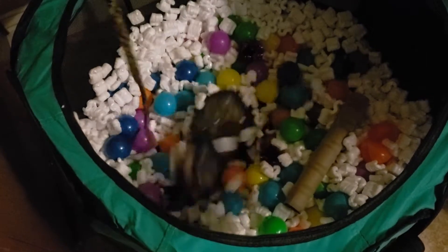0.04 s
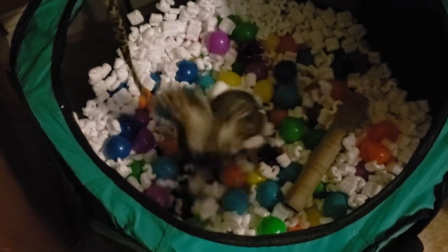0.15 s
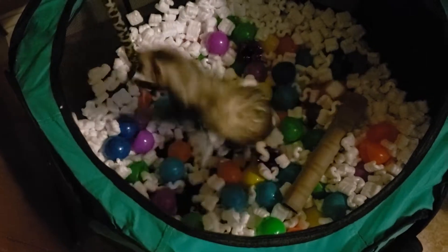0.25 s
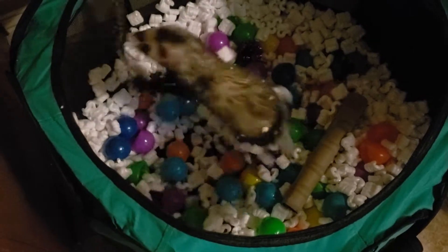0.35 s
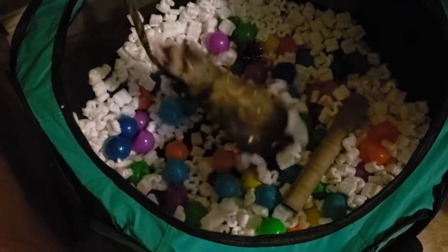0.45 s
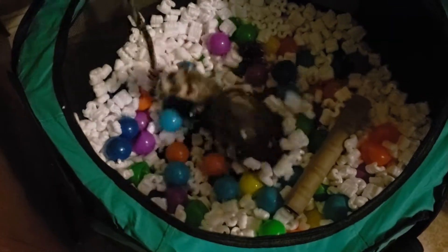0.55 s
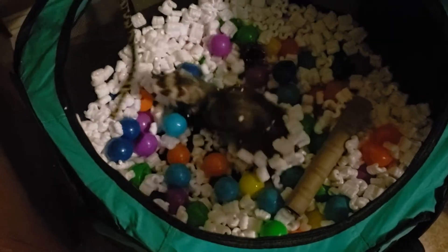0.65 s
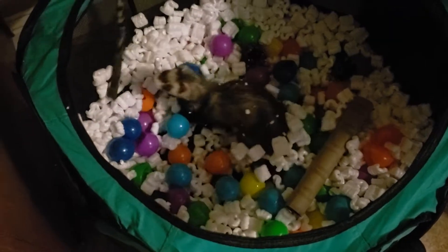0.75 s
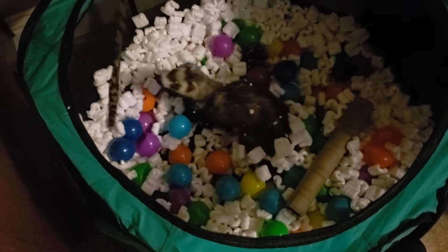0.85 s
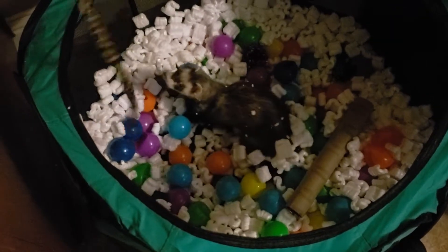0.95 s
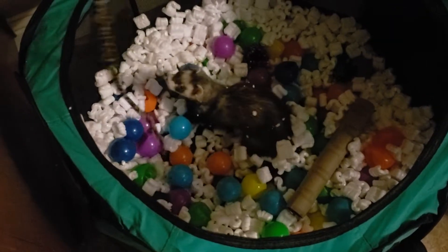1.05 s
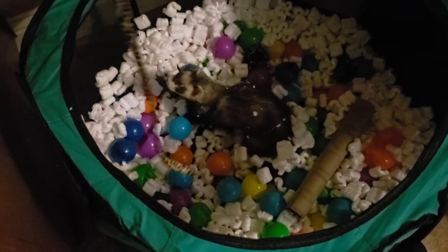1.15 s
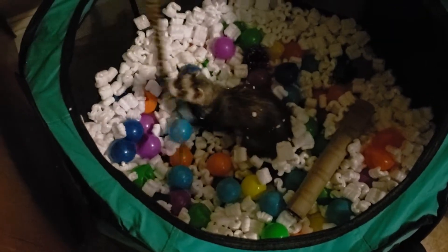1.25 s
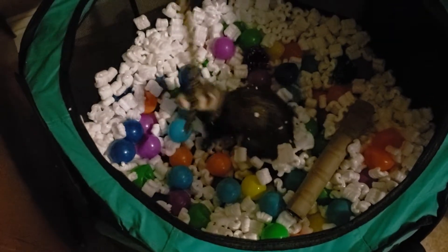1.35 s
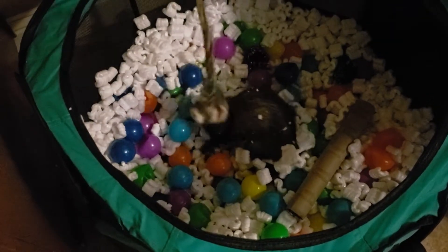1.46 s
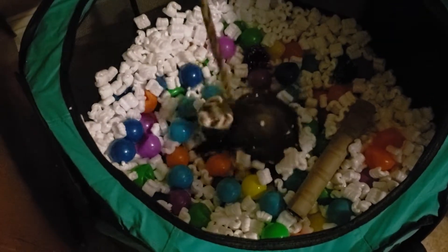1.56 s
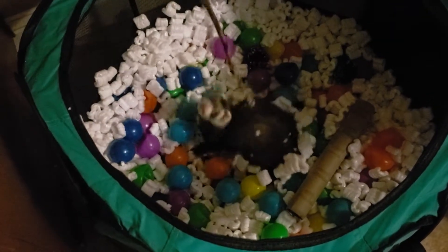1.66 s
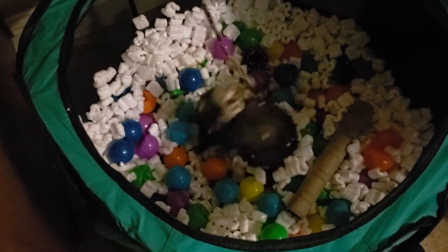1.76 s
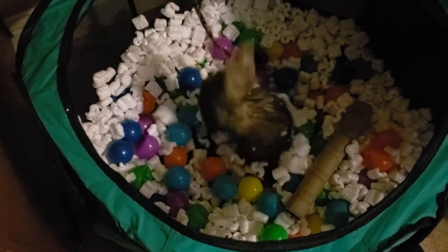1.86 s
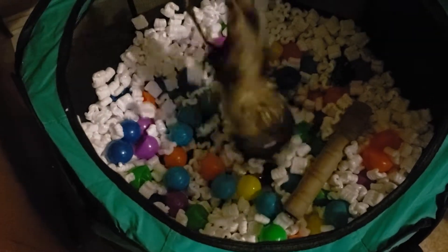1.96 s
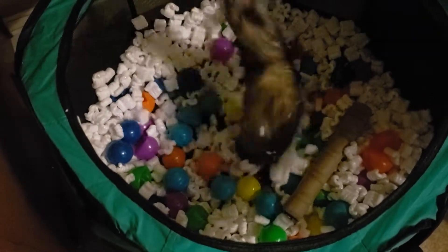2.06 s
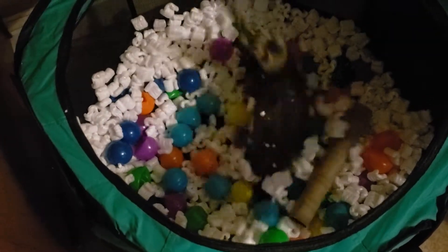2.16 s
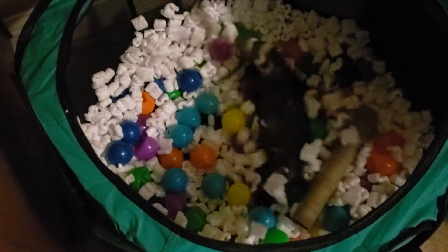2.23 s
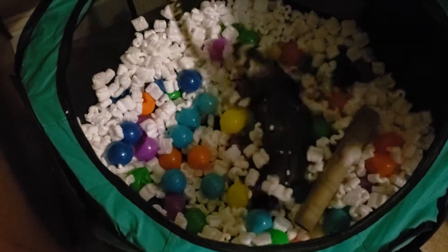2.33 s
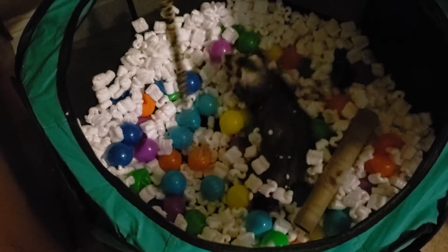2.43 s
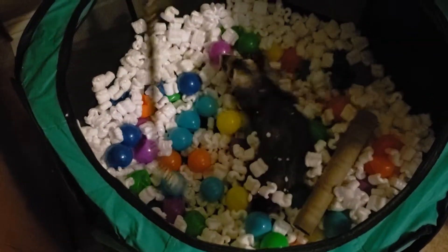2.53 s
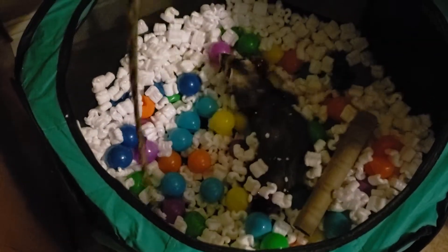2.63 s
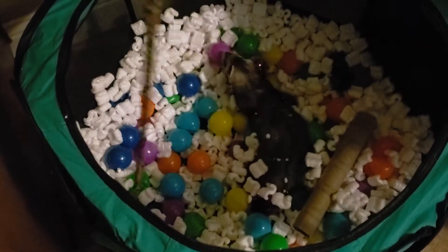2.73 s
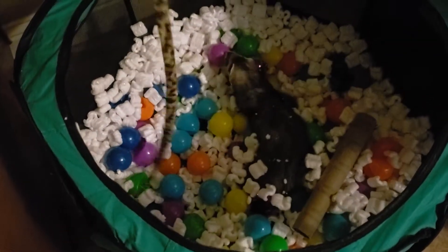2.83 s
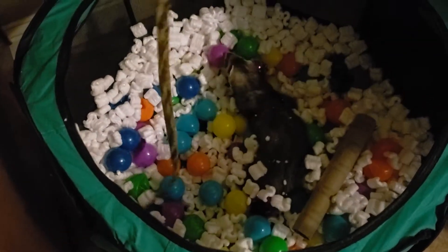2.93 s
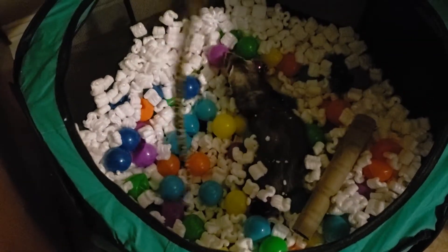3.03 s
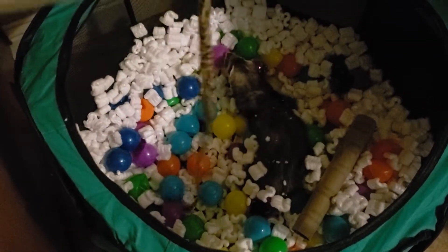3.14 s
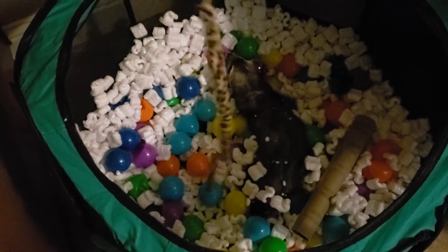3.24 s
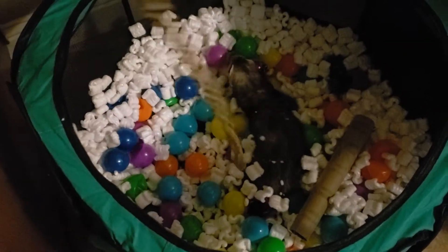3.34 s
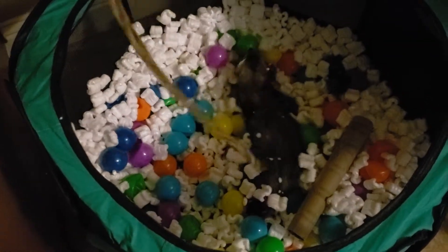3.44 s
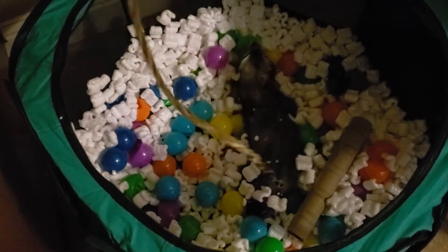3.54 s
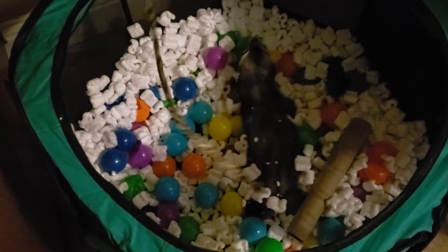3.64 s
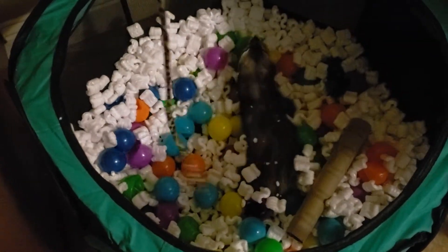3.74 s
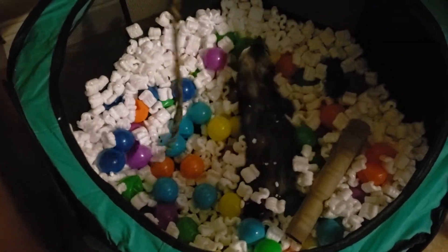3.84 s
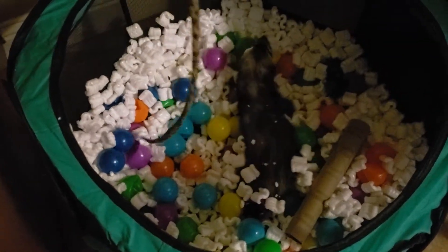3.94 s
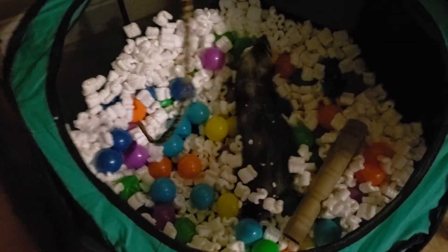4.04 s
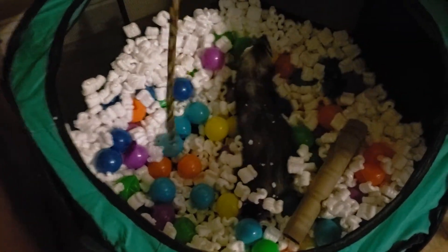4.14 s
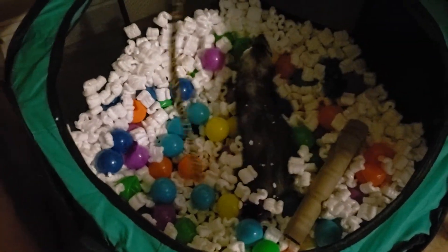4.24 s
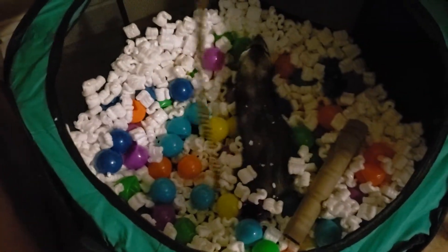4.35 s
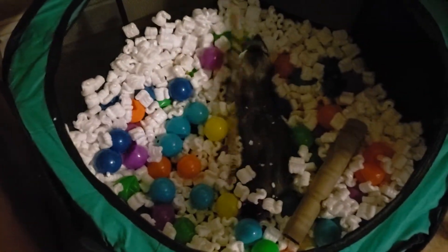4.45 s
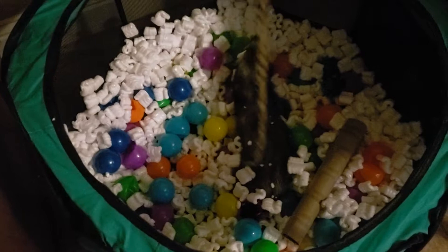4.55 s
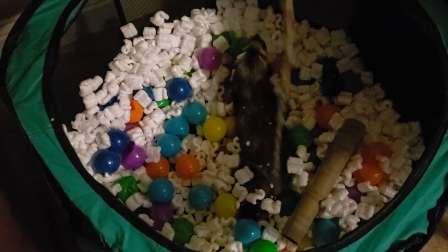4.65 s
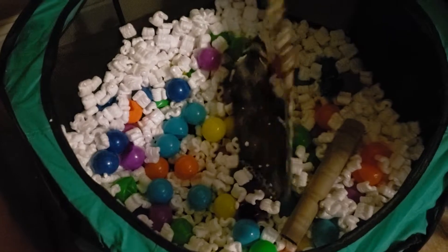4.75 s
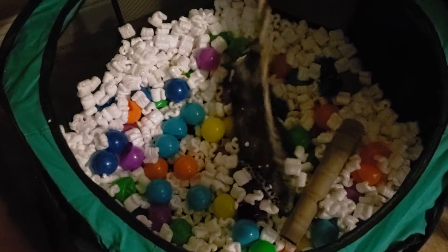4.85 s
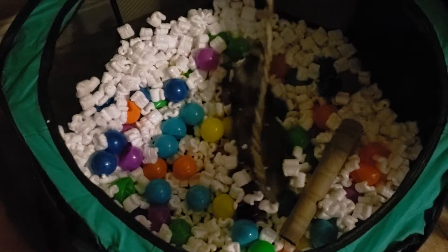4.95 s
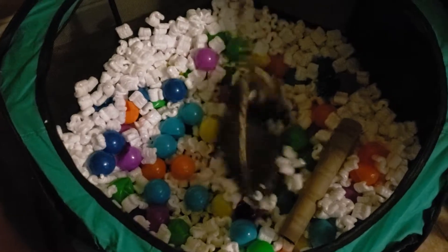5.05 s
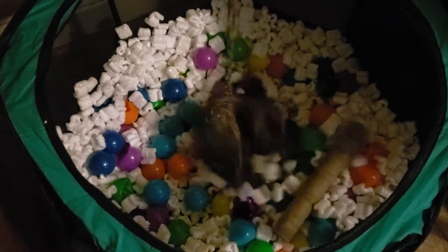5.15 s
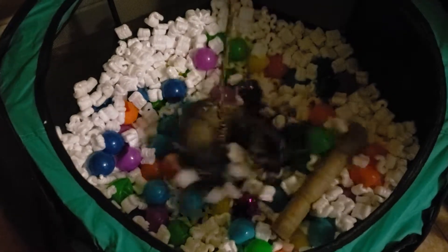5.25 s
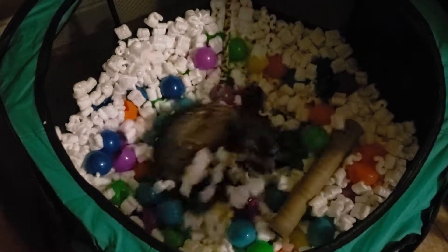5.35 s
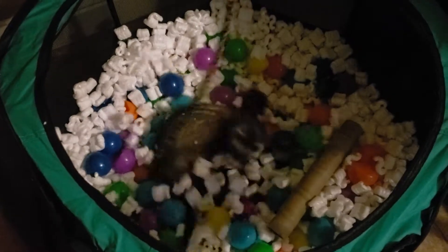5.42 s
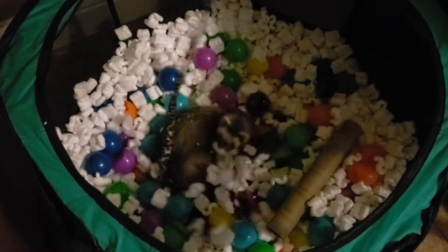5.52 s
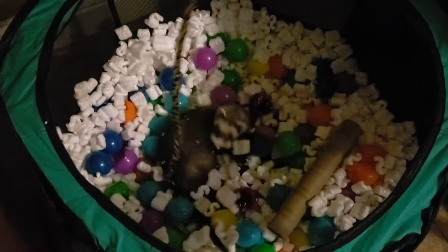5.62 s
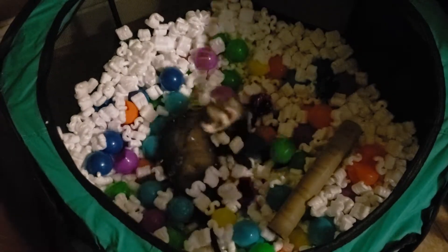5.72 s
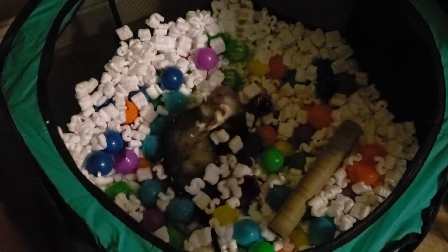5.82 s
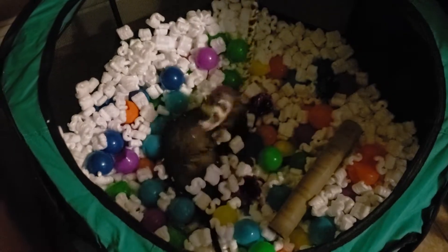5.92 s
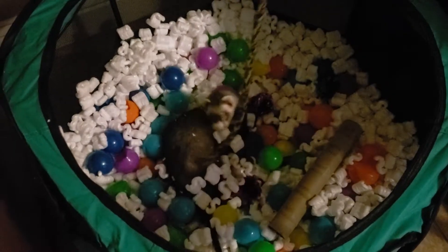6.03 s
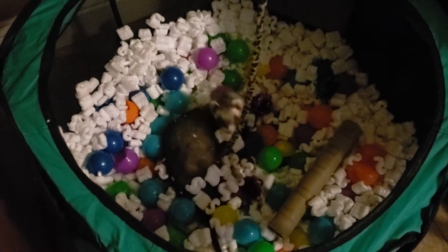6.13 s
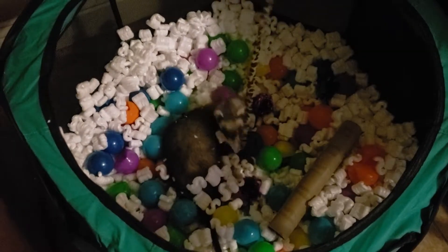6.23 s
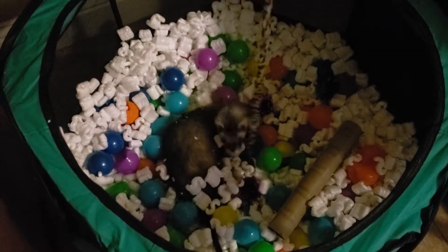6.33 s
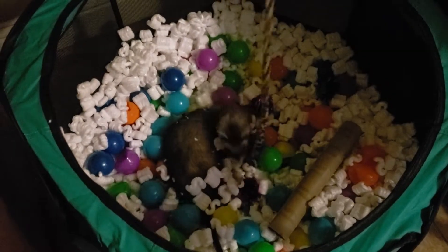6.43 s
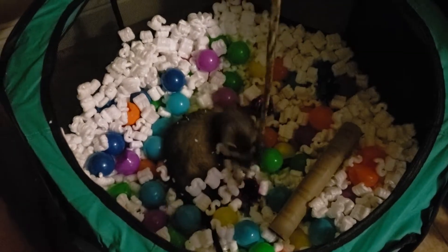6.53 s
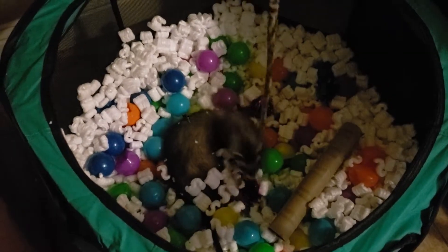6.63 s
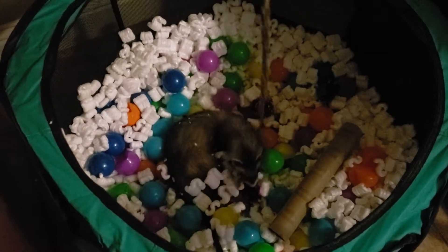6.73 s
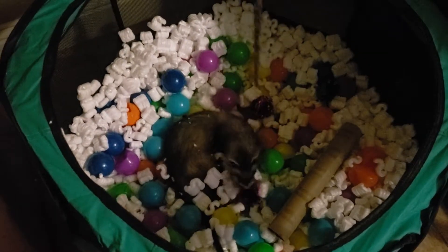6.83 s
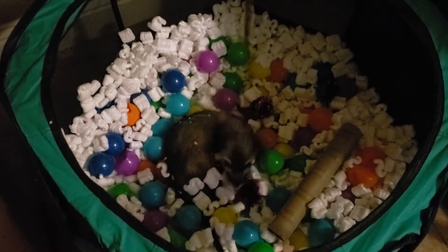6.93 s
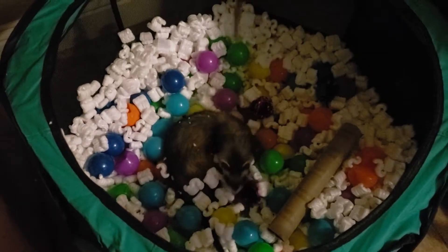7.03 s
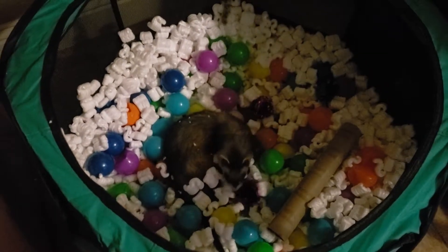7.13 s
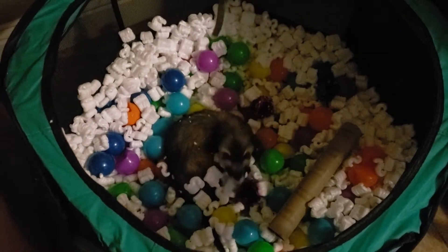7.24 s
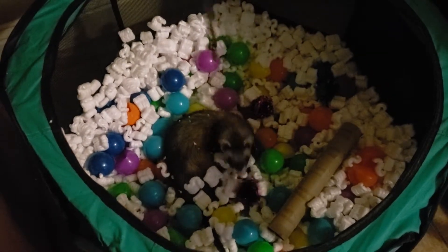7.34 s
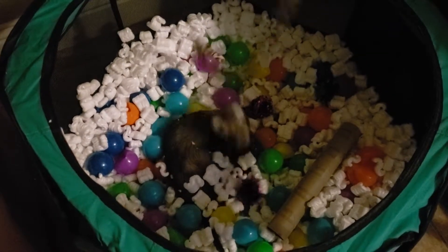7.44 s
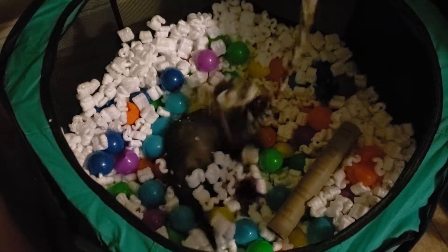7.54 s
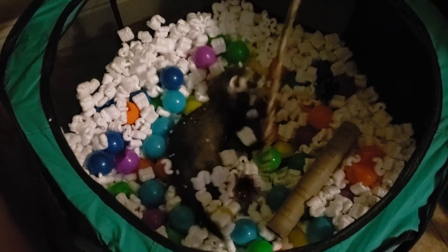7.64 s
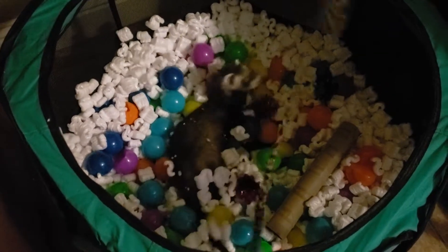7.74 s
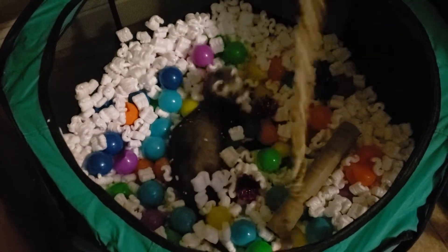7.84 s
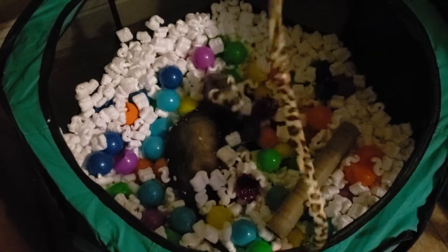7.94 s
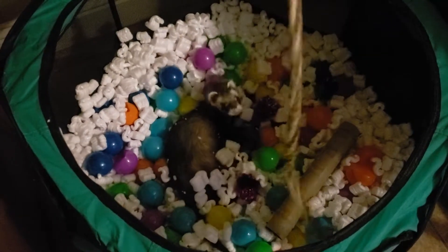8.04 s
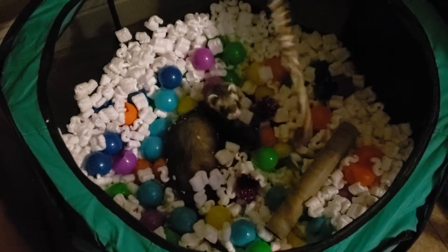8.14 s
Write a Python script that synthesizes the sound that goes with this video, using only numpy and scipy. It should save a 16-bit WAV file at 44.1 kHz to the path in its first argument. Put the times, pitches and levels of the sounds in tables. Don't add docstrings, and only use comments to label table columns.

```python
import sys
import numpy as np
from scipy import signal
from scipy.fft import rfft, irfft, next_fast_len
from scipy.io import wavfile
from scipy.ndimage import uniform_filter1d

SR = 44100
rng = np.random.default_rng(int(sys.argv[2]) if len(sys.argv) > 2 else 0)


def linear_from_db(decibels):
    return 10 ** (np.asarray(decibels, float) / 20)


def generate_wav(sig):
    pcm = np.round(np.clip(np.atleast_2d(sig).T, -1, 1) * 32767).astype(np.int16)
    wavfile.write(sys.argv[1], SR, pcm)


N = 360738
BLOCK = 64


def evened(x):
    return x / np.sqrt(np.mean(x ** 2) + 1e-20)


def read(points, hz):
    f, value = np.transpose(points)
    return np.interp(np.log(hz + 1), np.log(f + 1), value)


def ring(x, hz, width):
    radius = np.exp(-np.pi * width / SR)
    angle = 2 * np.pi * hz / SR
    return signal.lfilter([np.sin(angle)], [1, -2 * radius * np.cos(angle), radius * radius], x)


def coloured(x, shape, ports):
    size = next_fast_len(N)
    hz = np.fft.rfftfreq(size, 1 / SR)
    gain_db = read(shape, hz) + np.array([[.5], [-.5]]) * read(ports, hz)
    return irfft(rfft(x, size) * linear_from_db(gain_db), size)[:, :N]


def band_rms(x, lo_hz, hi_hz):
    sos = signal.butter(4, [lo_hz, hi_hz], "bandpass", fs=SR, output="sos")
    return np.sqrt(np.mean(signal.sosfilt(sos, x.mean(0)) ** 2))


def surges(rows, t, lift_db=0):
    s, db, rise, fall = np.transpose(rows)[:4, :, None]
    distance = np.where(t < s, (s - t) / abs(rise), (t - s) / abs(fall))
    level_db = db + lift_db - 20 * distance ** 1.257
    return 10 * np.log10((linear_from_db(level_db) ** 2).sum(0) + 1e-20)


# frequency in Hz, likeness from 0 to 1.
PORT_LIKENESS = [(60, 0.9), (300, 0.77), (700, 0), (1400, .02)]


def alike(z, hz):
    same = np.clip(read(PORT_LIKENESS, hz), 0, 1)
    return np.array([z[0], same * z[0] + np.sqrt(1 - same ** 2) * z[1]])


# frequency in Hz, density in dB per Hz.
HISS_SPECTRUM = [(25, -14), (70, 6.5), (125, -2), (229, 0), (450, -7), (1000, -20), (1600, -23),
                 (2050, -8.5), (2600, -10.5), (3800, -28), (4500, -46), (6400, -43), (7400, -34),
                 (9800, -20.5), (15800, -34)]
# frequency in Hz, left-right difference in dB.
HISS_LEAN = [(60, 18), (130, -1), (290, -1), (640, 3), (1410, 22), (3100, 27), (6820, 24), (15000, 7)]


def hiss():
    z = alike(rfft(rng.standard_normal((2, N))), np.fft.rfftfreq(N, 1 / SR))
    x = coloured(irfft(z, N), HISS_SPECTRUM, HISS_LEAN)
    return linear_from_db(-72) * x / band_rms(x, lo_hz=500, hi_hz=16000)


# start in seconds, length in seconds, pitch in Hz,
# glide in Hz, level in dB.
GROANS = [(3.791, .12, 303, 5, -67.5), (3.872, .07, 311, 16, -59), (3.931, .09, 330, 2, -54),
          (4.0, .06, 339, -2, -56.5), (4.089, .07, 337, -3, -63), (4.2, .15, 323, -10, -74),
          (5.956, .06, 309, 10, -58), (6.04, 0.081, 331.5, 7, -53), (6.109, .06, 319.5, -5, -56),
          (6.18, 0.052, 335.6, 3, -56.5), (6.27, .16, 329.3, -13, -62.5), (7.419, 0.035, 390, 0, -61.5),
          (2.401, .2, 545, -3, -55)]


def groans():
    out = np.zeros(N)
    for s, length, hz, glide, db in GROANS:
        u = np.linspace(-.5, .5, round(length * SR))
        tone = np.sin(2 * np.pi * np.cumsum(hz + glide * u) / SR) * np.cos(np.pi * u) ** 2
        out[round(s * SR):][:len(u)] += linear_from_db(db + 2.5) * tone
    return out


def modes(push, rows, widen):
    parts = [linear_from_db(db) * evened(ring(ring(push, hz, width), hz, widen * width)) for hz, width, db in rows]
    return evened(sum(parts))


# peak in seconds, level in dB, bounce in Hz,
# seconds to fall 20 dB (sign ignored).
JOLTS = [(.05, -65, 65, .3), (.3, -68, 62, 0.5), (.57, -47, 70, -0.15), (.72, -66.5, 61.8, 0),
         (1.26, -64.5, 60, 0.3), (1.5, -61, 59.7, 0.2), (1.8, -61, 58, 0.3), (2.17, -46.5, 72.3, 0.08),
         (2.27, -51, 72.4, 0.13), (2.45, -64, 78.5, 0.1), (2.6, -56.5, 80.4, .07), (2.75, -73, 72.1, .1),
         (3.09, -61, 62.1, .2), (3.4, -69, 70.7, 0.26), (3.7, -65, 71, -0.05), (3.85, -61, 85.4, -0.06),
         (3.91, -56, 73.8, 0), (4.03, -54, 68.5, .05), (4.1, -55.5, 67.9, .08), (4.23, -63, 65.5, 0.2),
         (4.33, -61, 68.2, 0.1), (4.395, -49, 76.9, .04), (4.47, -58, 74.6, .07), (4.61, -58, 64.8, 0.05),
         (5.05, -65.5, 71.6, .08), (5.18, -60, 75, .15), (5.4, -53, 87.9, 0.04), (5.52, -64, 74, .15),
         (5.79, -59, 63, 0.3), (5.94, -49, 75.1, 0.05), (6.01, -44, 76, 0.08), (6.105, -39.5, 69, 0.1),
         (6.19, -43, 76.66, .06), (6.235, -42.5, 71.2, 0.18), (6.33, -48, 70.8, 0.13),
         (6.42, -42.5, 72, 0.17), (6.57, -48, 78, .1), (6.64, -51.5, 74.5, 0.08), (6.7, -46, 74, 0.09),
         (6.81, -52, 68.15, .06), (6.86, -52.5, 76.8, 0.1), (6.96, -53.5, 67.2, 0.17), (7.15, -54, 82, 0.1),
         (7.29, -58, 73, .15), (7.43, -64, 75, .1), (7.55, -61, 74, 0), (7.72, -61, 66, -0.1),
         (8.0, -71, 67.8, -0.2)]
# peak in seconds, level in dB,
# seconds to rise 20 dB, seconds to fall 20 dB.
SLIPS = [(.005, -34, .1, 0.048), (.2, -40, 0.081, 0.056), (.56, -45.5, .12, .15), (1.82, -47, 0.056, .15),
         (2.03, -43.5, .12, .15), (2.17, -37, .05, 0.096), (2.36, -45.5, 0.38, 0.055),
         (2.46, -52.5, 0.052, 0.061), (2.59, -46, 0.038, 0.093), (3.43, -49.5, 0.089, 0.17),
         (3.89, -49, 0.12, 0.29), (3.99, -45, 0.149, 0.1902), (5.16, -46, 0.07, 0.22),
         (5.24, -46, 0.23, 0.036), (5.33, -43, 0.078, 0.31), (5.81, -41, 0.045, 0.14),
         (6.07, -43, 0.23, 0.19), (6.35, -51, 0.28, 0.43), (7.72, -59.5, 0.26, 0.13)]
# frequency in Hz, width in Hz, level in dB.
HAND_MODES = [(40.8, 30, 0.5), (71, 19, 3.5), (117, 29, 1)]
# frequency in Hz, width in Hz, level in dB.
CASE_MODES = [(120, 33, -9), (223, 42, -6), (336, 47, -5.5), (425, 113, -8)]


def grip():
    t, fine = np.arange(0, N + BLOCK, BLOCK) / SR, np.arange(N) / SR
    jerks = [(s, db, 0.57 * fall, fall) for s, db, hz, fall in JOLTS]
    jolt = np.interp(fine, t, linear_from_db(surges(jerks, t)))
    slip = np.interp(fine, t, linear_from_db(surges(SLIPS, t)))
    jolt = np.hypot(jolt, linear_from_db(-78.5))
    push = rng.standard_normal((3, N))
    bounce_hz = np.interp(fine, *np.transpose(JOLTS)[[0, 2]])
    bounce = np.sqrt(2) * np.sin(2 * np.pi * np.cumsum(bounce_hz) / SR)
    shake = modes(push[0], HAND_MODES, 2.0)
    creak = modes(push[1], CASE_MODES, 1.45)
    speed = 1 - .14 / (1 + slip / linear_from_db(-56))
    creak = np.interp(np.cumsum(speed), np.arange(N), creak)
    creak = creak / np.sqrt(uniform_filter1d(creak ** 2, size=1500) + .5)
    both = jolt * (bounce + linear_from_db(-6) * shake)
    both = both + linear_from_db(-11.0) * (slip + 0.36 * jolt) * creak + groans()
    odd = jolt * linear_from_db(-18.5) * evened(ring(push[2], 82, 40))
    return np.array([both + odd, both - odd])


# frequency in Hz, decay time t60 in seconds.
WALL_DECAY = [(300, 0.15), (3000, 0.022), (12000, 0.1)]


def pen(x, turns_per_s=2.3):
    hz, t, z = signal.stft(rng.standard_normal((2, 3, 9000)), SR, nperseg=256)
    z = alike(z, hz[:, None]) * linear_from_db(-60 * t / read(WALL_DECAY, hz)[:, None])
    tails = np.pad(signal.istft(z, SR, nperseg=256)[1], ((0, 0), (0, 0), (90, 0)))
    tails = tails / np.linalg.norm(tails[0, 0])
    turns = turns_per_s * np.arange(N) / SR + np.arange(3)[:, None] / 3
    shares = np.sqrt(2 / 3) * np.cos(2 * np.pi * turns)
    return signal.oaconvolve(x[:, None] * shares, tails, axes=2).sum(1)[:, :N]


# start in seconds, peak in dB, pitch in Hz, push into the bed in dB.
KNOCKS = [(0.145, -33, 850, 1), (0.387, -36, 806, -11), (0.473, -29, 840, -11), (0.5505, -24, 728, 10.5),
          (1.795, -35, 895, -33), (1.986, -40, 920, 0), (2.051, -33, 1010, 6), (2.175, -28.5, 851, 0),
          (2.22, -24, 947, 7.5), (2.461, -30.5, 1014, -6), (2.491, -33.5, 547, -14), (2.588, -39, 530, 5),
          (4.017, -49, 630, -11), (5.103, -35.5, 802, -13), (5.137, -36, 516, -15.5), (6.499, -59, 737, -2),
          (6.663, -32, 770, 7), (7.039, -53, 1010, -13), (7.129, -47, 828, -2), (7.428, -57, 990, 3),
          (3.408, -37, 900, -11), (3.28, -52, 850, -15), (.578, -25, 1420, -10),
          (7.684, -30.5, 1150, -10.5), (7.536, -47, 930, 9), (7.601, -36, 746, 6), (7.675, -31.5, 745, -3),
          (7.807, -38.5, 786, -6.5)]


def knocks():
    out, t = np.zeros(N + 2000), np.arange(1800) / SR
    age = t / .0016
    for s, db, hz, push_db in KNOCKS:
        push = linear_from_db(push_db) * np.sin(2 * np.pi * 350 * t) * np.exp(-t / 0.0019)
        note = np.sin(2 * np.pi * hz * t) * age * np.exp(1 - age)
        out[round(s * SR):][:1800] += linear_from_db(db - 8.0) * (note + push)
    return out[:N]


# start in seconds, length in seconds, pitch in Hz, level in dB.
SQUEAKS = [
    (4.40, .06, 3300, -73),
    (4.46, 0.065, 3600, -70),
    (4.44, .11, 5900, -82.5),
    (4.68, .08, 6450, -85.5),
    (4.46, .07, 3150, -75),
    (4.668, 0.044, 3595, -71),
    (1.986, 0.024, 1400, -49.5),
    (5.765, 0.07, 3300, -54.5),
    (5.8, .075, 3650, -59),
]


def squeaks():
    out = np.zeros(N)
    for s, length, hz, db in SQUEAKS:
        fuzz = evened(ring(rng.standard_normal(8000), hz, 0.019 * hz))[-round(length * SR):]
        out[round(s * SR):][:len(fuzz)] += linear_from_db(db) * fuzz * np.hanning(len(fuzz))
    return out * linear_from_db(np.array([[4], [-6]]))


# start in seconds, peak in dB, pitch in Hz, brightness in dB.
SNAPS = [(.0502, -34, 3250, -8), (.469, -27, 3430, -9), (3.405, -30, 1910, -13), (1.1327, -62, 2460, -13),
         (1.2426, -45, 3400, -6), (1.255, -39.5, 3080, -7), (1.526, -42, 3140, -12),
         (1.1667, -61, 3530, -7), (1.2, -58, 3800, -8), (.5516, -27, 2060, -15), (.6085, -25, 2550, -14),
         (.7567, -37, 2220, -15), (1.7454, -34.5, 3480, -12), (1.7719, -40.5, 2610, -7),
         (2.0542, -38, 3536, -15), (2.8782, -51, 2060, -16), (3.0283, -57, 2180, -18),
         (3.2294, -52, 2990, -18), (3.245, -52, 2910, -18), (3.255, -48, 2903, -18),
         (5.2019, -28, 3530, -23), (5.6294, -34, 3570, -10), (5.9038, -46, 3450, -17),
         (5.0477, -39, 3370, -0.5), (1.582, -35, 3630, -15), (1.6496, -49, 2130, -15),
         (1.9894, -36.5, 1800, -8), (2.1266, -34.5, 3500, -2.5), (2.1779, -39, 3244, -7),
         (2.4609, -25.5, 2820, -15.5), (2.5137, -28.5, 3450, -22), (2.5387, -31, 3080, -13.5),
         (2.5913, -30, 2900, -31.5), (2.765, -50.5, 2394, -7), (2.818, -40.5, 3450, -28),
         (2.916, -47, 2570, -23), (3.0595, -47.5, 2820, -22), (3.148, -45.5, 3060, -18.5),
         (3.2116, -52, 2980, -17), (3.6185, -39.5, 2692, -11.5), (4.2936, -58, 2619, -14),
         (5.136, -36, 3106, -2.5), (5.4104, -8, 2840, -19), (5.4202, -20.5, 3494, -12),
         (5.9606, -46.5, 3010, -22), (6.1937, -58, 2187, -9), (7.6026, -31.5, 2940, -9),
         (7.678, -23.5, 3700, -8)]
# start in seconds, peak in dB.
TICKS = [(0.0939, -37.5), (3.881, -64), (3.903, -60.5), (3.94, -62), (3.963, -61), (4.0133, -55.5),
         (4.998, -61), (5.023, -42), (6.6609, -50), (6.836, -58), (6.996, -63), (7.087, -50), (7.424, -55)]


def snaps():
    out, t = np.zeros((2, N + 2000)), np.arange(900) / SR
    rows = SNAPS + [(s, db, 2450, -0.5) for s, db in TICKS]
    for (s, db, hz, bright_db), noise in zip(rows, rng.standard_normal((len(rows), 2, 900))):
        age = t * hz / .8
        body = np.sin(2 * np.pi * hz * t) * age * np.exp(1 - age)
        grit = ring(noise, hz, 1800) * np.exp(-t / 0.0046) * linear_from_db(-14)
        tick = ring(noise, 10300, 3700) * np.exp(-t / 0.0055) * linear_from_db(bright_db + 5.5)
        lean_db = 13 - 0.41 * max(db + 35, 0)
        sides = linear_from_db(db - 6 + np.array([[.5], [-.5]]) * lean_db)
        out[:, round(s * SR):][:, :900] += sides * (body + (grit + tick) * np.minimum(t / 0.0032, 1))
    return out[:, :N]


def slides(per_s=45, fade_s=0.012):
    start = (rng.random(N) < per_s / SR).astype(float)
    heap = signal.lfilter([1], [1, -np.exp(-1 / (fade_s * SR))], start)
    return evened(9.5 + heap / heap.mean())


# peak in seconds, stirring
# in dB, seconds to rise 20 dB, seconds to fall 20 dB, body weight over the stirring in dB.
MOVES = [(.005, -43.5, 18, 0.18, -4.5), (.11, -46, .08, .5, -4), (.52, -38.5, 0.09, 0.1649, -5),
         (.622, -38, 0.22, 0.03, -5.5), (1.256, -54.5, 0.06, .2, -15.5), (1.69, -49, 0.24, -0.09, -10),
         (1.76, -44.5, 0.07, 0.15, -14.5), (1.82, -41.5, 0.03, 0.1463, -6.5),
         (2.12, -47, 0.35, 0.09, -3.5), (2.185, -35.5, 0.0251, 0.2133, -3.5),
         (2.23, -39, 0.0726, 0.2041, -4), (2.52, -52, 0.1, 0.14, -1), (3.405, -45.5, 0.09, 0.13, -11.5),
         (3.455, -47.5, 0.15, 0.0753, -6), (5.046, -43, 0.0145, 0.15, -14),
         (5.234, -45, 0.16, 0.2127, -2.5), (5.405, -39, 0.188, 0.1529, -3), (5.55, -46, .35, 0.2463, -4.5),
         (5.646, -51, 0.17, 0.0663, -14), (5.72, -50.5, 0.16, 0.16, -27.5), (5.865, -53, 0.32, 0.04, -1),
         (7.606, -46, 0.0232, 0.27, -1.5), (7.68, -43.5, 0.075, 0.02, -0.5), (7.86, -51, 0.36, 0.2, -8),
         (.93, -66, 0.17, 0.21, -16), (1.55, -53.5, 0.36, .3, -26), (2.78, -64.5, 1, 0.36, -13.5),
          (8.04, -58, 0.61, 0.16, -7.5), (3.154, -71.5, 0.021, .05, -0.5), (3.56, -60.5, 0.36, 0.32, -8),
          (3.9, -76, .2, .6, -21), (4.03, -71.5, 0.28, 0.19, -6), (4.47, -72.5, 0.21, .15, -11),
          (.67, -48, 0.13, 0.21, -3.5), (4.676, -77.5, 0.2, 0.3, -8), (4.91, -74, 0.047, 0.13, -11),
          (5.93, -65.5, 0.061, .27, -2), (6.195, -69, 0.027, 0.088, -2), (6.3, -75.5, .15, 0.62, -9),
          (6.62, -67, 0.51, .1, -5), (6.672, -59.5, 0.014, 0.15, 3), (6.84, -68, 0.37, 0.24, -3.5),
          (7.02, -64, 0.19, .15, -14), (7.118, -61, 0.039, 0.078, -6.5), (7.2, -77, 0.14, 0.33, 2.5),
          (7.51, -60, .08, .3, -22), (7.56, -50.5, 0.1, 0.17, -11.5), (5.111, -44.5, 0.042, 0.51, -5)]
# peak in seconds, stirring in dB, body weight over it in dB.
CLUMPS = [(.05, -44, -14), (.097, -43.5, -9), (.165, -46.5, 3.5), (.34, -50, -17), (.395, -48.5, -3.5),
          (.475, -40.5, -4), (.578, -46, 1), (0.613, -38.5, -6), (.66, -43, -2.5), (.757, -55.5, -10.5),
          (1.07, -69, -24), (1.2, -70, -20), (1.235, -55, -21), (1.43, -57, -17), (1.615, -63, -18),
          (1.7, -48, -7), (1.755, -47.5, -15), (1.775, -45, -10), (1.89, -61, -3), (2.06, -47.5, -3),
          (2.1, -50.5, -2), (2.4, -50.5, -1), (2.55, -52, -10), (2.595, -50, 1.5), (2.635, -53, -3),
          (2.85, -63, -15), (3.29, -59.5, -12), (3.62, -62.5, -17), (3.93, -70, -27), (4.4, -72, -13),
          (5.012, -56, -27), (5.11, -48, -9), (5.21, -42, 2), (5.31, -46, -0.5), (5.59, -46.5, -7),
          (5.635, -46.5, -11), (5.715, -47.5, -15), (5.99, -64, -2.5), (6.37, -69, -10), (6.59, -66, -10),
          (1.91, -53.5, -4), (2.15, -46, -5), (6.27, -76, -15), (6.5, -69, -5), (4.69, -77, -20),
          (3.895, -74, -20), (3.965, -68, -20), (6.65, -61.5, -7.5), (6.96, -65, -9), (7.04, -62.5, -4),
          (7.52, -54, -23), (7.59, -54, -10), (7.62, -46, -1.5)]
# peak in seconds, level in dB, seconds to rise 20 dB,
# seconds to fall 20 dB (signs ignored).
PRESSES = [(.08, -57, -0.5, -1), (.55, -39.5, -0.44, 0.14), (.85, -62, .5, 2.5), (2.23, -40, 0.1, 0.3),
           (2.69, -56.5, 3, 0.26), (1.45, -62, 0, .5), (5.79, -53, 0.06, 0.15), (3.17, -75, 2, 6.5),
           (3.38, -47, 0.2, 0.04), (4.46, -71, 0, 0.5), (5.866, -49.5, 0.34, 0.04), (7.04, -60, 0.08, 0.1),
           (7.118, -58, 0.2, 0.1)]


def stirring(t):
    tumbles = [(s, db, 0.032, 0.037, heavy) for s, db, heavy in CLUMPS]
    moves = MOVES + tumbles
    heavy_db = np.transpose(moves)[4][:, None]
    crushed = linear_from_db(surges(moves, t, -2 + 0.3 * heavy_db)) ** 2
    crushed = crushed + linear_from_db(surges(PRESSES, t)) ** 2
    return surges(moves, t), 10 * np.log10(crushed), surges(moves, t, heavy_db)


def contacts(count=26, hits=14000, spread_db=3.5, sharp=2.74, apart_s=.0002, patchy_db=2.5):
    out, heap = np.zeros((2, N)), slides()
    stir = stirring(np.arange(0, N + BLOCK, BLOCK) / SR)
    patches = uniform_filter1d(rng.standard_normal((count, 330)), size=2, axis=0)
    patches = evened(uniform_filter1d(patches, size=2, axis=1))
    for hz, patch in zip(np.geomspace(130, 15500, count), patches):
        at = rng.integers(60, N - 60, hits)
        lag = np.clip(rng.standard_normal(hits) * apart_s * SR + 2.3, -59, 59).astype(int)
        size = linear_from_db(spread_db * np.minimum(rng.exponential(1, hits), 4)) * rng.choice([-1, 1], hits)
        stir_db, crunch_db, weight_db = (db[at // BLOCK] for db in stir)
        weight = np.clip(np.log(1700 / hz) / 0.088, 0, 1)
        weight = weight * (1 - 0.46 * np.exp(-(np.log(hz / 920) / 0.15) ** 2))
        crunch = np.clip(np.log(4700 / hz) / .2, 0, 1) - weight
        patch_db = patchy_db * np.interp(at / N, np.linspace(0, 1, len(patch)), patch)
        move_db = stir_db + crunch * (crunch_db - stir_db - 3.0) + weight * (weight_db - stir_db - 2.0)
        size = evened(size) * heap[at] * linear_from_db(patch_db + move_db)
        train = np.array([np.bincount(at, size, N), np.bincount(at + lag, size, N)])
        out += ring(ring(train, hz, hz / sharp), hz, hz * 0.71) * hz / 20000.0
    return out


# frequency in Hz, density in dB per Hz.
RUSTLE_SPECTRUM = [(70, -36), (160, -26), (400, -11), (600, -10.5), (800, -6.5), (1050, -6.5), (1450, -8),
                   (2600, -5.5), (3800, -3.5), (4400, -10.5), (6300, -8), (7500, -11), (10200, 0.66),
                   (15800, -8)]
# frequency in Hz, left-right difference in dB.
RUSTLE_LEAN = [(60, 0), (120, 0.4), (240, -3), (480, 2), (950, 4), (1890, 6.5), (3770, 8), (7520, 4),
               (15000, -1)]


def rustle():
    return linear_from_db(12.0) * coloured(contacts(), RUSTLE_SPECTRUM, RUSTLE_LEAN)


def scene():
    bed = rustle() + squeaks()
    cracks = snaps()
    balls = knocks() * np.ones((2, 1))
    walls = pen(linear_from_db(-7) * bed + linear_from_db(-6) * cracks + linear_from_db(-7) * balls)
    return bed + cracks + balls + walls + grip() + hiss()


def low_pass(x):
    return signal.sosfilt(signal.butter(12, 16950, fs=SR, output="sos"), x)


def record(dry):
    low_cut = signal.butter(3, 48, "highpass", fs=SR, output="sos")
    edge = signal.firwin(1023, 15760, window=("kaiser", 10), fs=SR)
    mix = signal.oaconvolve(signal.sosfilt(low_cut, dry), edge[None], "same")
    return low_pass(mix)


dry = scene()
out = record(dry)
generate_wav(out)
```